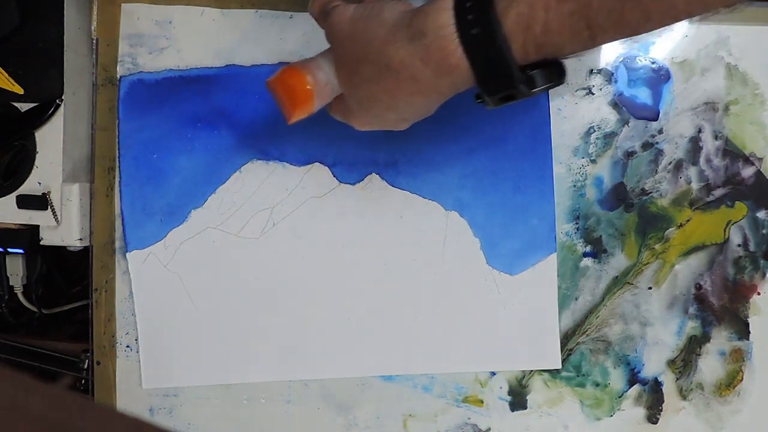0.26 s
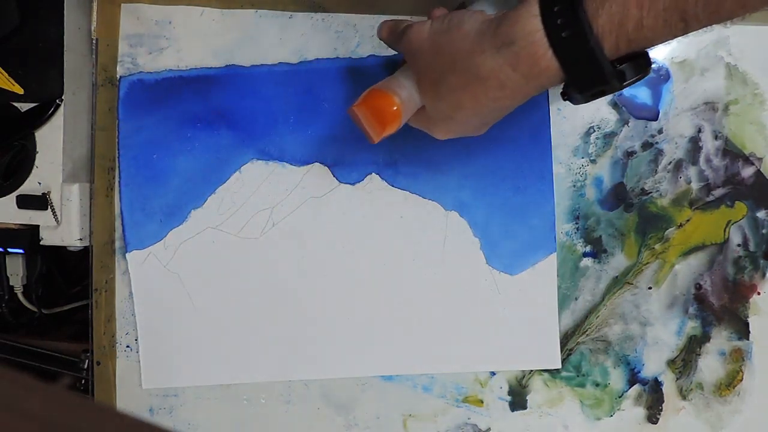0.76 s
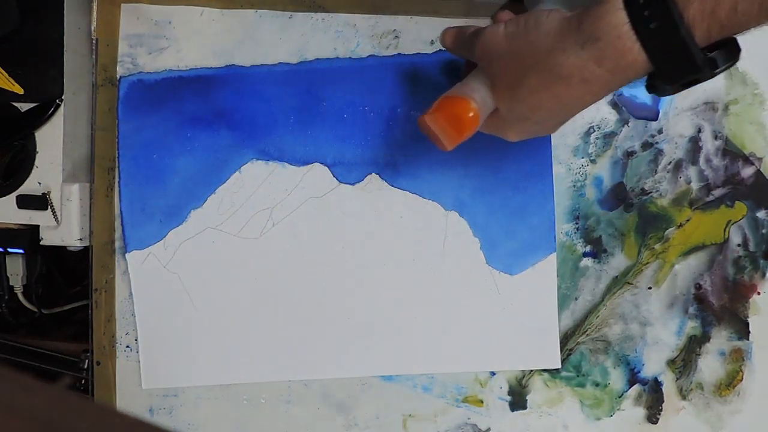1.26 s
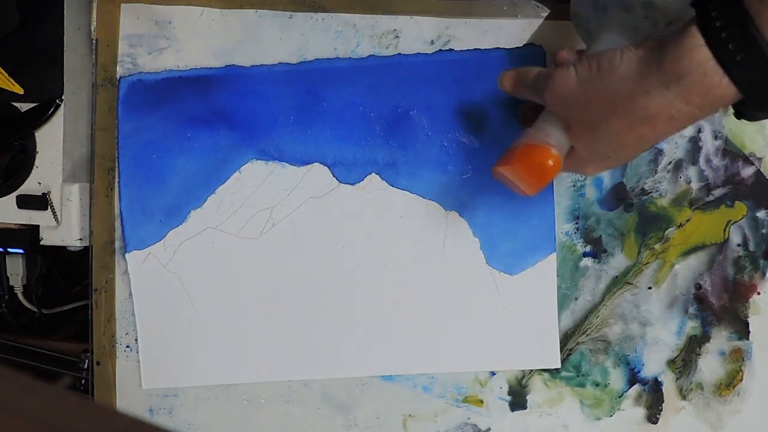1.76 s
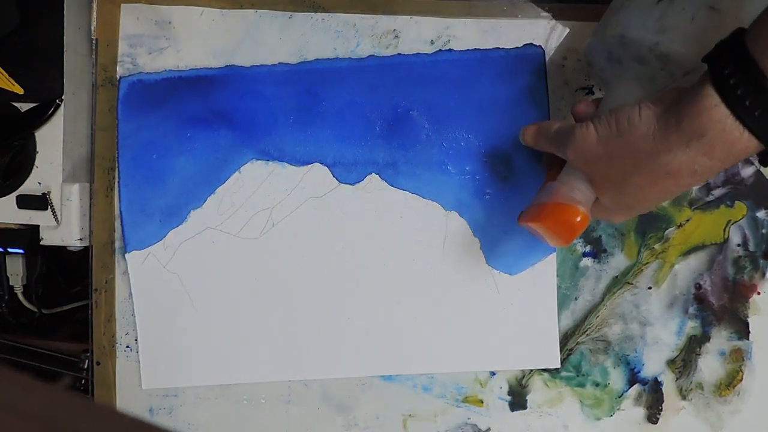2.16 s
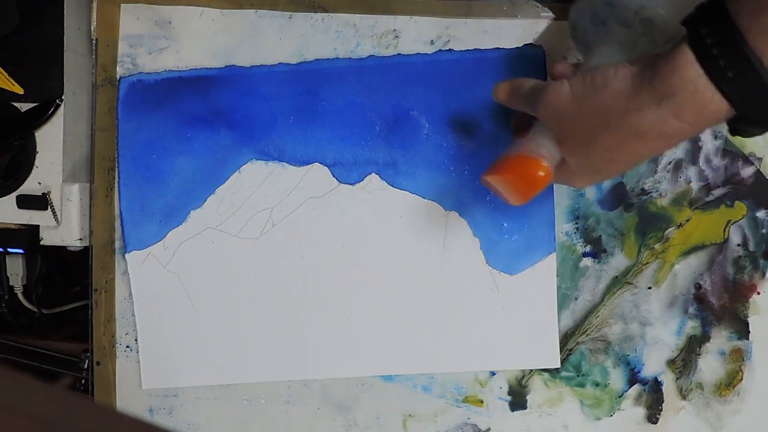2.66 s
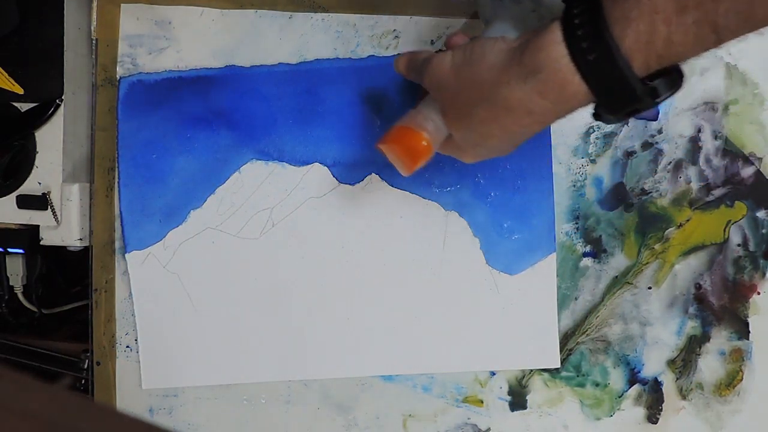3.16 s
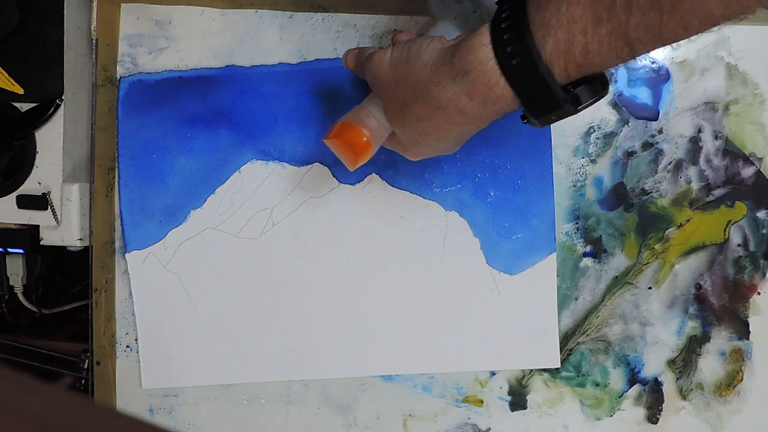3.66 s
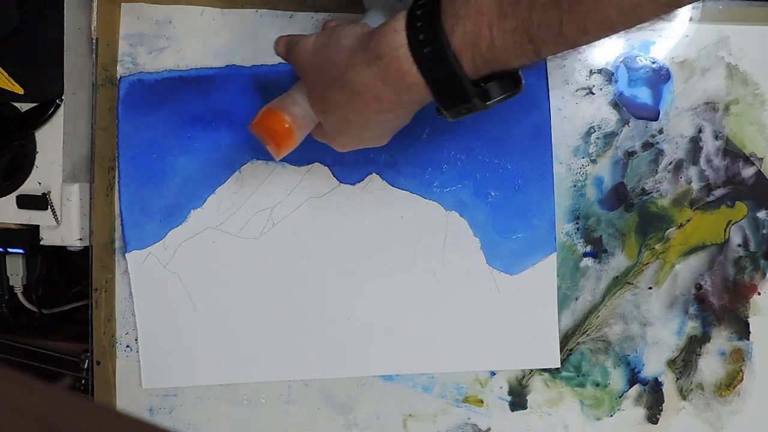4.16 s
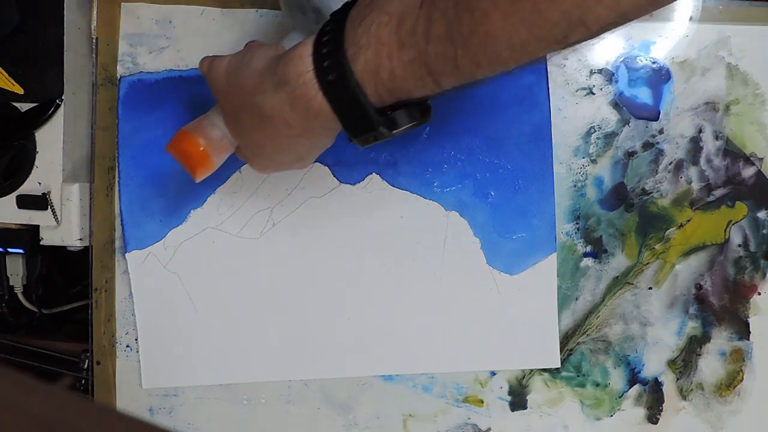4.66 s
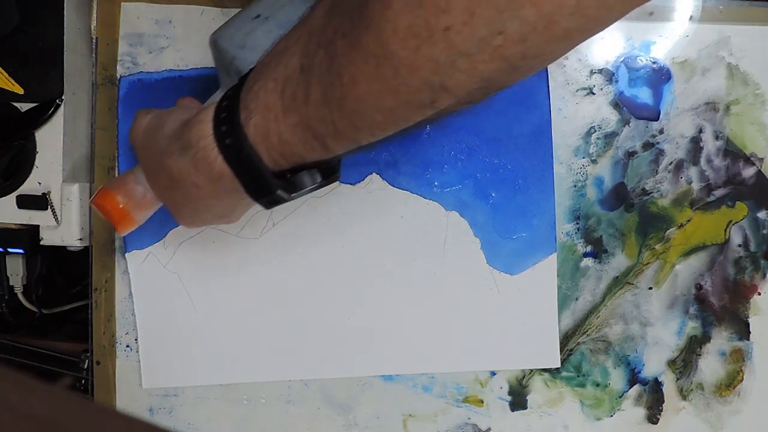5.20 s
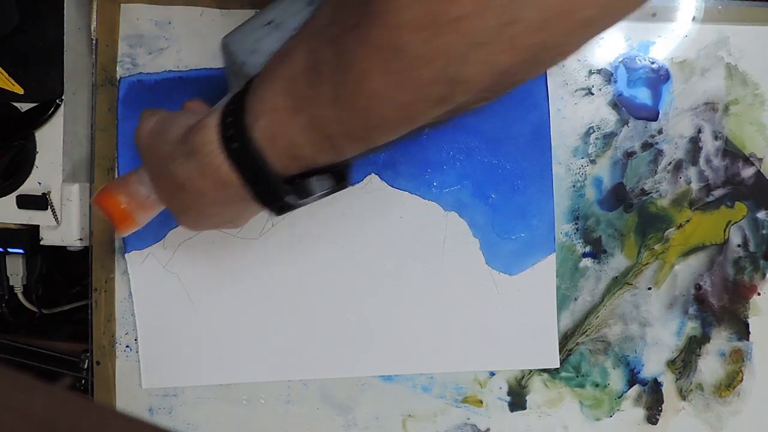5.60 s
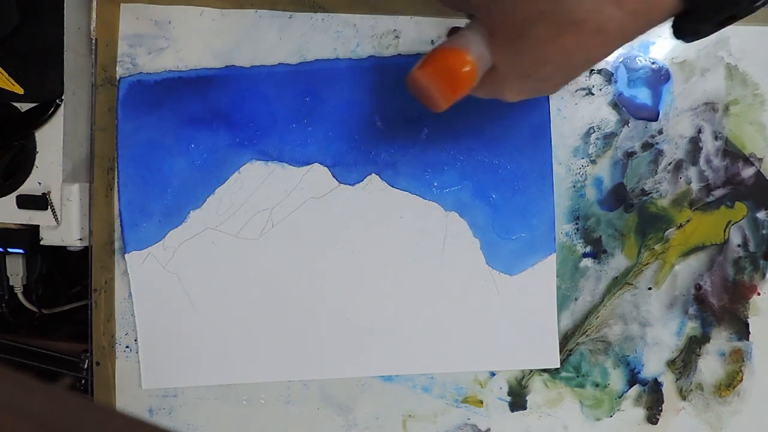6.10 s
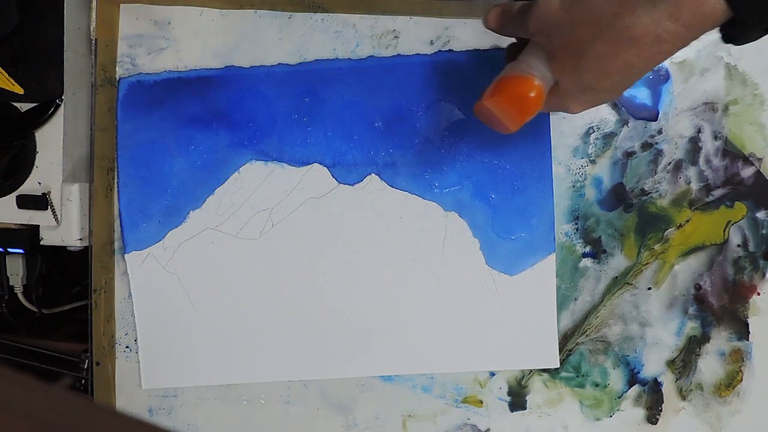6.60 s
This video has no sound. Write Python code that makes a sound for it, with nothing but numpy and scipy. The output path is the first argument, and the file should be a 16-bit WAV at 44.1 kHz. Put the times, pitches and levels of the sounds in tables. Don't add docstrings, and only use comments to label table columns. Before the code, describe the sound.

A quiet indoor room with a faint low fan and mains hum and soft microphone hiss. From about 0.2 s a small pump bottle squirts mist close by: short, sharp, bright hisses of under a tenth of a second, each with a hollow rush off the paper, arriving roughly every 0.4 s. The puff at 2.4 s starts softer, and a longer gap leads to the next at 3.0 s. Small ticks and faint low thuds of the plunger sit between puffs. From about 3.8 s the squirts get shorter and drier, the clicks grow clearer, and the background rises a little. They continue until 5.6 s. At 5.8 s the bottle gives a hollow plastic knock, then a prominent click at 6.2 s and a few smaller ones. A last crisp, strong puff comes at 6.6 s with a soft thud, and the room noise sinks away. The sound shifts slightly left and right with the hand.

```python
import sys
import numpy as np
from scipy import signal
from scipy.fft import rfft, irfft, next_fast_len
from scipy.io import wavfile
from scipy.ndimage import uniform_filter1d

SR = 44100
rng = np.random.default_rng(int(sys.argv[2]) if len(sys.argv) > 2 else 0)


def materialize(psi):
    bounded = np.clip(np.atleast_2d(psi).T, -1, 1)
    quanta = np.round(bounded * 32767).astype(np.int16)
    wavfile.write(sys.argv[1], SR, quanta)


def voltage_ratio(level):
    return 10 ** (np.asarray(level, float) / 20)


N = 301644

# valve opens [t/s], stroke [s], peak [level/dB], opening re peak [dB], leak before opening [dB]
SQUEEZES = [(0.179, 0.091, -37, -3.5, -15), (0.5547, 0.086, -36.5, 1, -44), (0.9395, .092, -36.5, -2, -42),
            (1.3243, 0.091, -37, 1, -43), (1.7037, 0.1, -36.5, 0, -36), (2.0683, 0.097, -38, -1.5, -24),
            (2.425, .1, -41, -11.5, -3), (3.0265, 0.079, -37, 1, -27), (3.4231, 0.069, -40, 1, -46),
            (3.8225, 0.044, -36, 0.5, -44), (4.1719, 0.049, -34, -2.5, -10),
            (4.5561, 0.048, -36, -2.5, -10), (4.9137, 0.035, -35.5, -1.5, -10),
            (5.2605, 0.06, -36.5, -1.5, -6.5), (5.6305, 0.061, -36, 3.5, -72), (6.5825, 0.087, -34, 5, -54)]


def evened(x):
    return x / np.sqrt(np.mean(x ** 2) + 1e-20)


def read(points, hz):
    f, value = np.transpose(points)
    return np.interp(np.log(hz + 1), np.log(f + 1), value)


def add(mix, s, sound):
    part = mix[:, round(s * SR):][:, :sound.shape[1]]
    part += sound[:, :part.shape[1]]


def sides(pan_db):
    return voltage_ratio(np.array([[pan_db], [-pan_db]]) / 2)


def peak(hz, centre_hz, width_hz):
    return 1 / np.sqrt(1 + (2 * (hz - centre_hz) / width_hz) ** 2)


def bump(t, centre_s, width_s):
    return np.exp(-((t - centre_s) / width_s) ** 2)


def noise(size, shape, same, lead_s=0):
    fast = next_fast_len(size, real=True)
    hz = np.fft.rfftfreq(fast, 1 / SR)
    a, b = rfft(rng.standard_normal((2, fast)))
    like = np.clip(same(hz), -1, 1)
    delay_s = lead_s / (1 + (hz / 6500) ** 4)
    right = like * a * np.exp(-2j * np.pi * hz * delay_s) + np.sqrt(1 - like ** 2) * b
    return evened(irfft(shape(hz) * np.array([a, right]), fast)[:, :size])


def hand(s):
    # t/s, left-right [dB], hollow [f/Hz], hollow rush re peak [dB], splash on paper [dB], nozzle facing up [dB]
    hand_path = [(0.15, 2.5, 1070, -17, 3, -2.5), (0.95, 0, 1100, -22, 0.5, 0),
                 (1.3, -0.5, 1550, -15.5, -3, 0), (2.1, -1.5, 1520, -19, -0.5, 0),
                 (2.45, -0.5, 1570, -17, 5.5, -1), (3.4, -0.5, 1100, -15.5, -1.5, -3.5),
                 (3.85, 2, 1200, -12.5, 4, -2.5), (4.2, 2.5, 1030, -7, -4, -2.5),
                 (4.55, 2, 1020, -8.5, 0.5, -0.5), (4.95, 3.5, 880, -13.5, 5, -4),
                 (5.3, 3, 1010, -17, 12, -2), (5.7, 3, 960, -19, 7.5, -1.5),
                 (6.6, -1.5, 1270, -14.5, 1.5, 2)]
    times, *columns = np.transpose(hand_path)
    return [np.interp(s, times, c) for c in columns]


def puff(opens, stroke, peak_db, opening_db, leak_db):
    # f/Hz, level/dB per Hz
    jet = [(1000, -20.5), (1700, -7), (2040, -8), (2420, -10), (3150, -18.5), (3700, -11.5), (5270, -2.5),
           (5910, -5), (7930, -11.5), (11900, -1), (14200, -5), (15700, 1.5), (16500, -37)]
    # f/Hz, left-right likeness [0-1]
    jet_same = [(500, 0.88), (1200, 0.93), (2400, 0.55), (5000, 0.42), (8000, 0.2), (15000, 0.2)]
    pan_db, hollow_hz, rush_db, splash_db, facing_db = hand(opens)
    top_db = 6.0 + 0.5 * opening_db + facing_db
    lower_db = 10.5 + 0.45 * rush_db + 0.66 * opening_db
    t = opens - 0.04 + np.arange(8192) / SR
    since = np.maximum(t - opens, 0)

    build_s, sag_db, sag_bend, shut_db_per_s = 0.017, 4.5, 1.11, 890
    shut_db = shut_db_per_s * np.maximum(since - stroke, 0)
    build_db = opening_db * np.maximum(1 - since / build_s, 0) + 1 * bump(since, 0.038, 0.016)
    stroke_sag_db = sag_db * np.minimum(since / stroke, 1) ** (2 * sag_bend)
    level_db = peak_db + build_db - stroke_sag_db - shut_db

    gulp_db, sigh_share = -8.5, 0.38
    gulp_and_sigh = bump(since, 0.021, 0.0086) + sigh_share * bump(since, stroke, 0.023)
    swell_db = (gulp_db - rush_db) * gulp_and_sigh

    leak = voltage_ratio(leak_db + 1030 * np.minimum(t - opens, 0)) * (t < opens)
    valve = np.clip((t - opens + 0.0029) / 0.0024, 0, 1) + leak

    paths_ms = np.append(0.2945, rng.uniform(0.448, 4.2, 5))
    shares = np.append(0.38, rng.uniform(-0.3, 0.3, 5))

    def jet_gain(hz):
        comb = abs(1 + np.exp(2j * np.pi * np.outer(hz, paths_ms) / 1000) @ shares)
        tilt_db = splash_db * peak(hz, 2640, 1430) ** 2 + lower_db * peak(hz, 3760, 3300) ** 2
        tilt_db += top_db * peak(hz, 12500, 4000) ** 2 - 0.5 * rush_db * peak(hz, 8250, 1670) ** 2
        return comb * voltage_ratio(read(jet, hz) + tilt_db)

    def hollow_gain(hz):
        return peak(hz, hollow_hz, 770) ** 2 / (1 + (820 / (hz + 1)) ** 8)

    def same(hz):
        return read(jet_same, hz)

    lead_s = 0.000017 * pan_db
    hiss = noise(len(t), jet_gain, same, lead_s)
    hollow = noise(len(t), hollow_gain, same, lead_s)
    sputter = voltage_ratio(1.7 * evened(uniform_filter1d(rng.standard_normal(len(t)), size=250)))
    fill = np.clip(since / 0.017, 0, 1) ** 2
    dulling = np.clip(0.084 * (peak_db - level_db), 0, 0.5)
    hiss = hiss - dulling * np.diff(hiss, prepend=0)
    spray = sides(pan_db) * voltage_ratio(level_db) * hiss
    hollow_db = peak_db + rush_db + swell_db - 0.8 * shut_db
    rush = sides(0.58 + 0.16 * pan_db) * voltage_ratio(hollow_db) * fill * hollow
    return t[0], valve * sputter * (spray + rush)


def clumped(x, patchy_db=2.5):
    hz, t, z = signal.stft(x, SR, nperseg=256)
    patches = rng.standard_normal(z.shape[1:])
    patches = uniform_filter1d(patches, size=6, axis=0)
    patches = evened(uniform_filter1d(patches, size=5, axis=1))
    return signal.istft(z * voltage_ratio(patchy_db * patches - 1.37), SR, nperseg=256)[1][:, :N]


def ring(hz, db, t60):
    t = np.arange(6000) / SR
    return voltage_ratio(db - 60 * t / t60) * np.sin(2 * np.pi * hz * t) * (1 - np.exp(-t * hz / 0.6))


def pump():
    # t/s, peak [level/dB], ring [f/Hz], ring share [dB]
    ticks = [(0.503, -54, 1420, 2), (0.898, -52, 1240, -13), (2.0068, -54, 1020, 2), (2.229, -60, 1190, 5),
             (2.371, -47, 1390, -4), (2.6412, -51, 1440, 10), (2.9582, -53, 1790, 0),
             (3.7673, -45, 1240, -45), (3.968, -57.5, 2370, 10), (4.118, -53.5, 1870, 6.5),
             (4.3428, -49, 1250, -7), (4.509, -40.5, 1780, 1.5), (4.6925, -51, 1280, 3),
             (4.856, -42.5, 1140, -4), (4.901, -45, 2230, -1), (5.0401, -49.5, 1250, 7),
             (5.209, -47.5, 1150, 4), (5.3802, -46, 1230, 5), (5.5815, -41, 1220, -4),
             (5.7625, -46.5, 1250, 0), (6.1456, -40, 1740, -14), (6.2079, -26.5, 1340, -4.5),
             (6.429, -44, 1180, -4), (6.4464, -48.5, 1380, -3), (6.4548, -38, 1290, -1),
             (6.545, -41, 1260, 0.5)]
    # t/s, peak [level/dB], ring [f/Hz]
    thuds = [
        (0.209, -55, 216),
        (0.952, -55.5, 360),
        (2.077, -53.5, 468),
        (2.641, -52.5, 177),
        (3.049, -59, 188),
        (4.182, -56, 175),
        (4.93, -60, 213),
        (5.209, -54, 180),
        (5.639, -54, 167),
        (6.601, -41.5, 178),
    ]
    # t/s, peak [level/dB], left-right [dB]
    knocks = [
        (5.8, -32.5, 2),
    ]
    # f/Hz, level/dB, t60 [s]
    body = [(197, -5.5, 0.054), (343, -7.5, 0.041), (493, -3, 0.071), (557, -1, 0.06), (1330, -11, 0.036),
            (1670, -8.5, 0.022), (3770, -12, .015), (5600, -21, 0.048)]
    out, t = np.zeros((2, N)), np.arange(6000) / SR
    tick_t60_s, tick_pan_db = 0.022, 1.5
    for s, db, hz, ring_db in ticks:
        def scrape_gain(f):
            return peak(f, 1.46 * hz, 1800) ** 2 * f / (f + 1500) / (1 + (f / 3600) ** 4)

        scrape = noise(len(t), scrape_gain, lambda f: 0.71 + 0 * f)
        scrape *= voltage_ratio(-5.5 - 60 * t / tick_t60_s) * (1 - np.exp(-t / 0.0009))
        tick = scrape + ring(hz, ring_db, 0.66 * tick_t60_s)
        add(out, s, sides(tick_pan_db) * voltage_ratio(db) * tick)
    for s, db, hz in thuds:
        thud = ring(hz, db - 5, 0.092) + ring(1.84 * hz, db + 0.5, 0.041)
        add(out, s, sides(1.2) * thud)
    for s, db, pan_db in knocks:
        crack = noise(len(t), lambda f: f / (f + 3000), lambda f: 0.77 + 0 * f)
        crack *= voltage_ratio(-15.5 - 60 * t / 0.069)
        add(out, s, sides(pan_db) * voltage_ratio(db) * (crack - sum(ring(*mode) for mode in body)))
    return out


def walls(x):
    # f/Hz, t60 [s]
    decay = [(500, 0.23), (2000, 0.23), (6000, 0.2), (14000, 0.18)]
    taps = np.zeros((2, SR // 2))
    at = np.arange(200, SR // 2 - 20, 20)
    jittered = at + rng.integers(0, 20, (2, len(at)))
    taps[[[0], [1]], jittered] = rng.choice([-1., 1.], (2, len(at)))
    hz, t, z = signal.stft(taps, SR, nperseg=256)
    dying = z * voltage_ratio(-60 * t / read(decay, hz)[:, None])
    tail = signal.istft(dying, SR, nperseg=256)[1]
    tail = tail + 0.64 * tail[::-1]
    return signal.fftconvolve(x, tail / np.linalg.norm(tail[0]), axes=1)[:, :N]


def ducking_db():
    opens, _, peak_db = np.transpose(SQUEEZES)[:3, :, None]
    since = np.maximum(np.arange(0, N, 64) / SR - opens, 0)
    depth_db = np.maximum(peak_db + 38, 0) * 1.3
    dips = depth_db * (1 - np.exp(-since / 0.051)) * np.exp(-since / 0.52)
    return -dips.sum(0).repeat(64)[:N]


def room_noise():
    # t/s, room level/dB
    gain = [(0.0, -66.5), (0.5, -68), (1.29, -69), (1.66, -68), (2.27, -71.5), (2.82, -70.5), (3.05, -66),
            (3.22, -70), (3.47, -68), (3.9, -60.5), (4.11, -61.5), (4.32, -62), (4.88, -61), (5.64, -61),
            (6.29, -61.5), (6.61, -62.5), (6.71, -66)]
    # f/Hz, level/dB per Hz
    air_shape = [(13, -26), (22, 1), (32, -6.5), (48, -8), (86, -12), (123, -10.5), (145, -14.5),
                 (200, -10.5), (275, -17), (354, -14.5), (760, -16.5), (901, -13), (1290, -22),
                 (1670, -24.5), (3500, -35), (4550, -75), (7700, -120)]
    # f/Hz, left-right likeness [0-1]
    air_same = [(30, 0.75), (60, 0.55), (130, 0.8), (300, 0.44), (800, .36), (1600, 0.06), (3500, 0.03),
                (15000, 0.1)]
    # f/Hz, left-right [dB]
    air_pan = [(30, 4.5), (240, 0.5), (950, 1.5), (3770, 5.5), (15000, 2)]
    # f/Hz, width [Hz], level re room noise [dB]
    fan_lines = [(48.8, 2.5, -16), (185.3, 2.3, -24), (204.8, 2.1, -20)]
    # f/Hz, level/dB per Hz
    hiss_shape = [(880, -17.5), (1500, -2), (2740, -6), (3930, -10), (13500, -19), (15700, -20),
                  (16500, -41)]
    gain_s, gain_db = np.transpose(gain)
    room_db = np.interp(np.arange(N) / SR, gain_s, gain_db) + ducking_db() + 0.83
    hiss_db = -70.5 + 0.61 * (room_db + 66)

    def same(hz):
        return read(air_same, hz)

    def air_gain(hz):
        fan = sum(voltage_ratio(db + 14.0) * peak(hz, f, w) ** 2 for f, w, db in fan_lines)
        return voltage_ratio(np.outer([0.5, -0.5], read(air_pan, hz))) * (voltage_ratio(read(air_shape, hz)) + fan)

    air = noise(N, air_gain, same)
    mains_hz, mains_db = 118.7, -5.5
    waver = evened(uniform_filter1d(rng.standard_normal((2, N)), size=5000))
    mains_phase = 2 * np.pi * np.cumsum(mains_hz + 1.29 * waver[1]) / SR
    mains = voltage_ratio(mains_db + 0.98 * waver[0]) * np.sin(mains_phase)
    hiss = noise(N, lambda hz: voltage_ratio(read(hiss_shape, hz)), same)
    offset_db, highpass_hz = 30.5, 2.03
    offset = -voltage_ratio(uniform_filter1d(room_db, size=600) + offset_db)
    pole = np.exp(-2 * np.pi * highpass_hz / SR)
    creep = signal.lfilter([1, -1], [1, -pole], offset - offset[0])
    return voltage_ratio(room_db + 6.5) * (air + sides(1.5) * mains) + voltage_ratio(hiss_db + 4.5) * hiss + sides(2.5) * creep


def scene():
    mist = np.zeros((2, N))
    for squeeze in SQUEEZES:
        add(mist, *puff(*squeeze))
    bottle = pump() + clumped(mist)
    return bottle + voltage_ratio(-11.5) * walls(bottle) + room_noise()


def narrowed_treble(x):
    mono_hz, sparse_hz, edge_hz = 6800, 13700, 15760
    hz, t, z = signal.stft(np.array([x[0] + x[1], x[0] - x[1]]) / 2, SR, nperseg=1024)
    mid, side = z
    f = hz[:, None]
    level_db = 10 * np.log10((abs(mid[hz > mono_hz]) ** 2).sum(0) + 1e-14)
    loud = level_db > np.median(level_db) + 14
    attack = np.diff(level_db, prepend=0) > 9
    before_attack = np.convolve(attack, np.ones(3), "full")[2:][:len(t)] > 0

    draws = rng.random((2, len(hz) // 10 + 1, len(t) // 4 + 1))
    fold, hole = draws.repeat(10, 1).repeat(4, 2)[:, :len(hz), :len(t)]
    fold_high = fold > np.where(loud, 0.25, 0.07 + 0.3 * (f > sparse_hz))
    fold_low = loud & (fold > 0.75) & (f > 2000)
    folded = np.where(f > mono_hz, fold_high, fold_low) & ~before_attack

    def across(power):
        return uniform_filter1d(power, 20, 0) + 1e-20

    mid_power = across(abs(mid) ** 2)
    pan = loud * across((side * mid.conj()).real) / mid_power
    whole = np.sqrt((1 + across(abs(side) ** 2) / mid_power) / (1 + pan ** 2))
    mid, side = np.where(folded, [whole * mid, pan * whole * mid], [mid, side])
    chance = np.where(f > sparse_hz, np.where(loud, 0.04, 0.5), 0.04 * loud * (f > 2500))
    kept = np.where(hole < chance, 0.04, 1) * (f < edge_hz)
    return signal.istft(kept * np.array([mid + side, mid - side]), SR, nperseg=1024)[1][:, :N]


def low_pass(x):
    return signal.sosfilt(signal.butter(12, 16820, fs=SR, output="sos"), x)


def record(dry):
    mix = narrowed_treble(dry)
    return low_pass(mix)


dry = scene()
out = record(dry)
materialize(out)
```